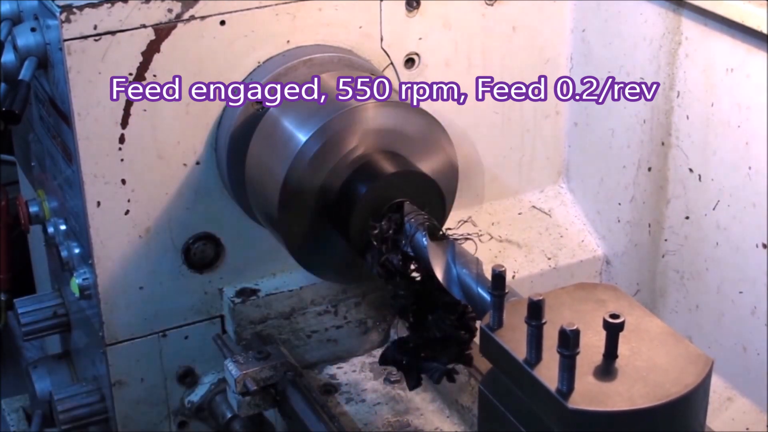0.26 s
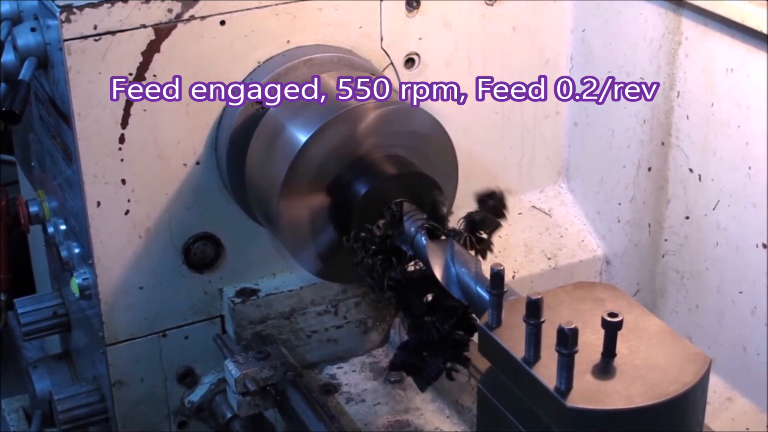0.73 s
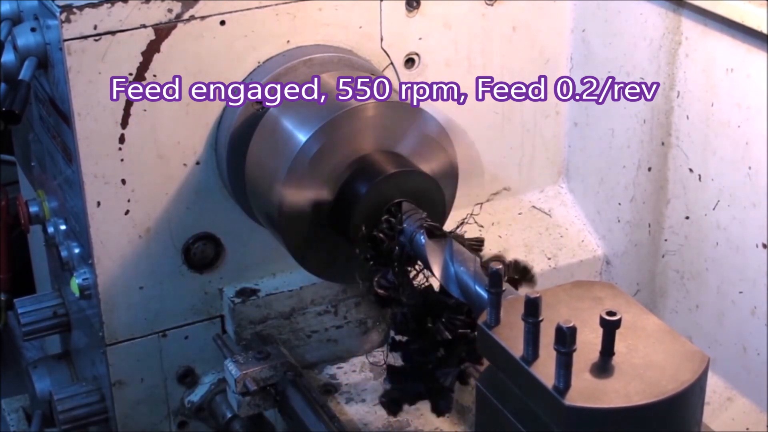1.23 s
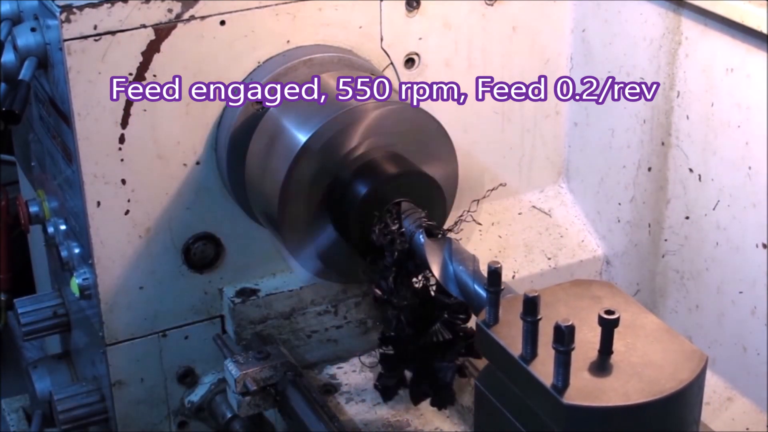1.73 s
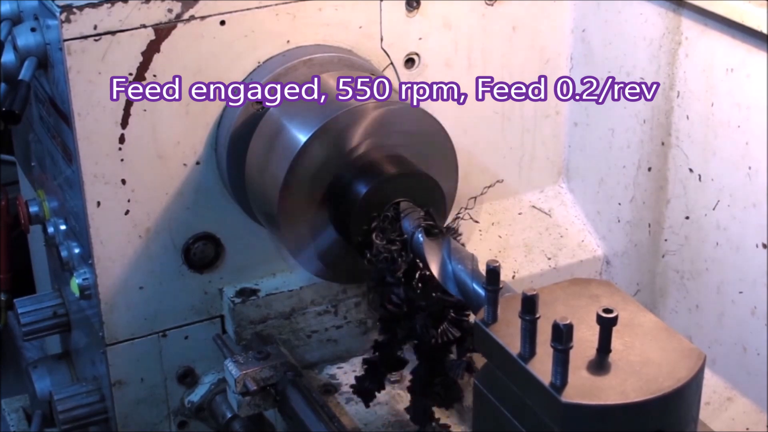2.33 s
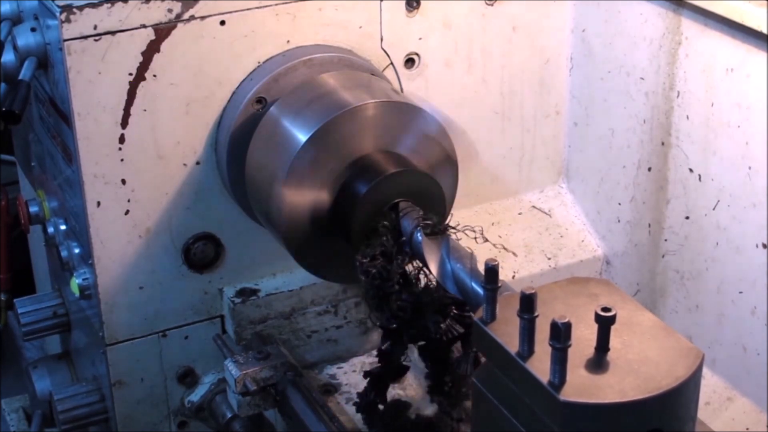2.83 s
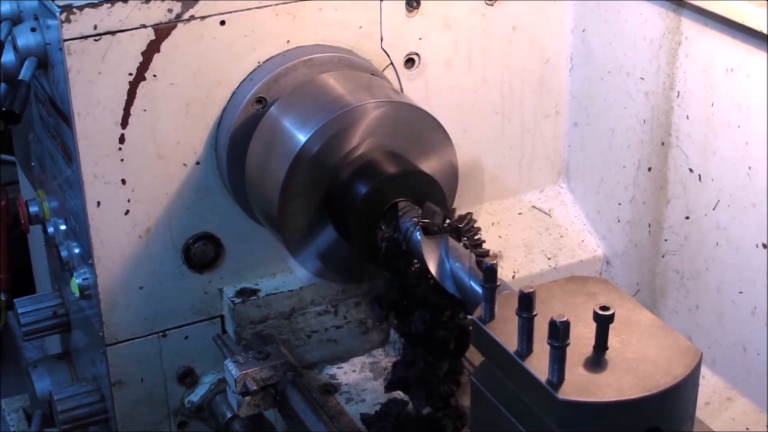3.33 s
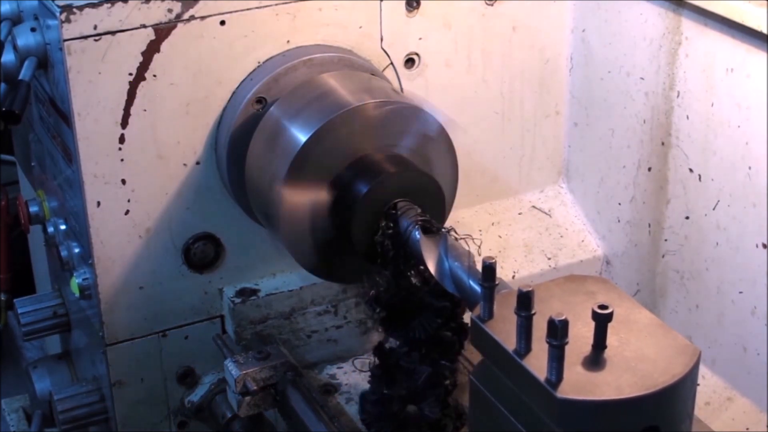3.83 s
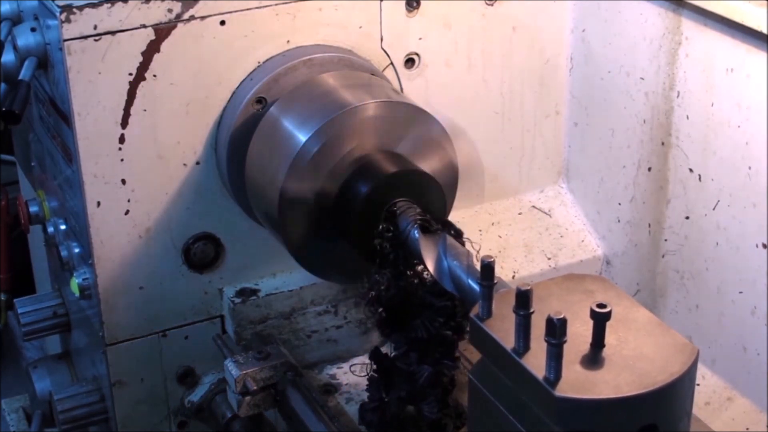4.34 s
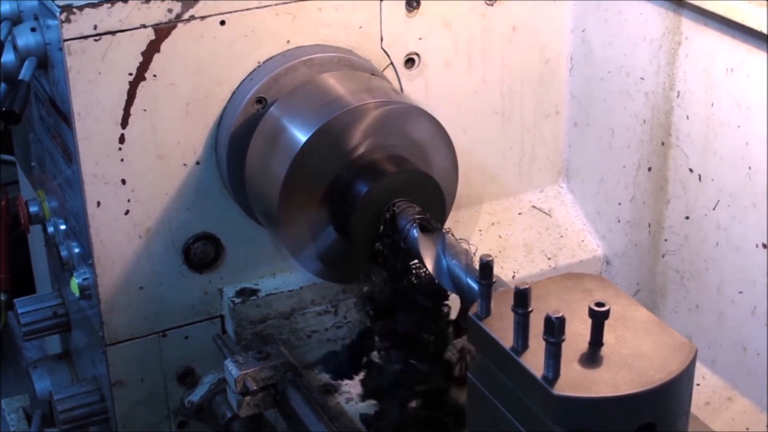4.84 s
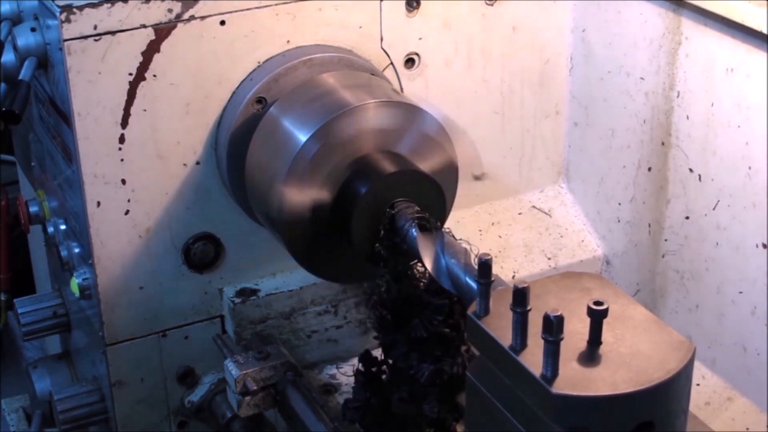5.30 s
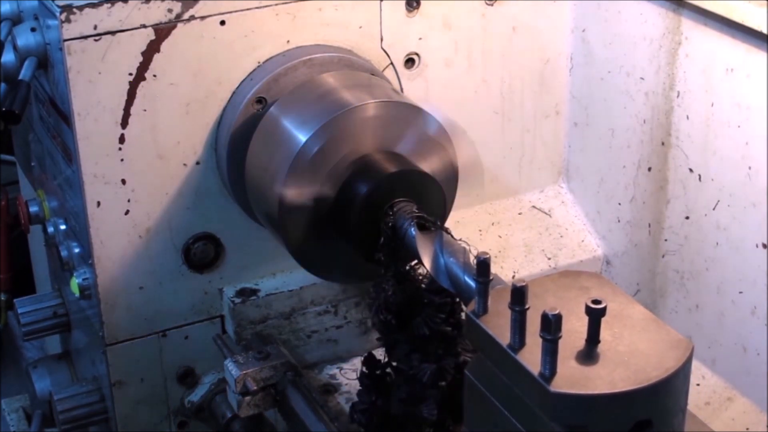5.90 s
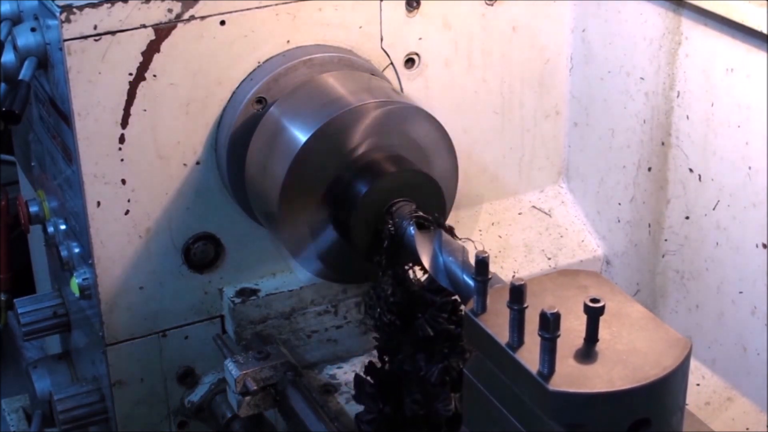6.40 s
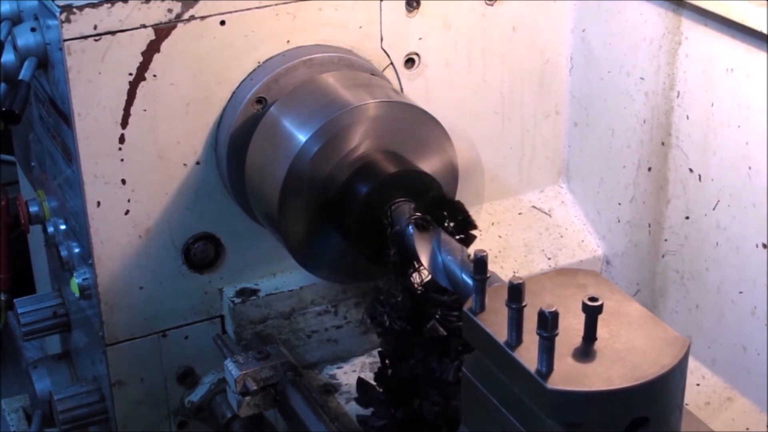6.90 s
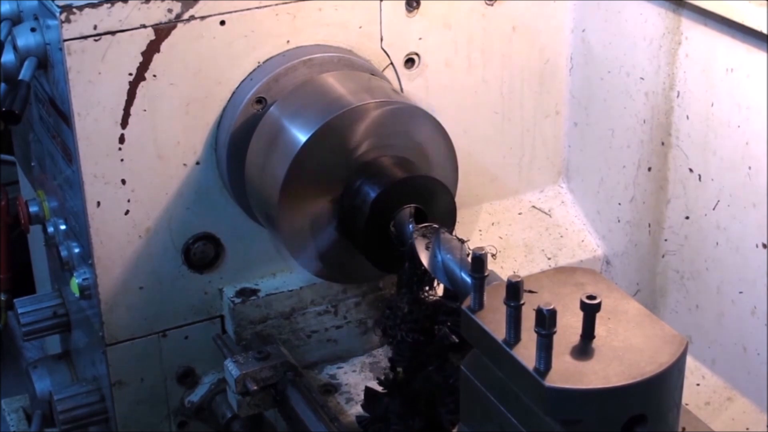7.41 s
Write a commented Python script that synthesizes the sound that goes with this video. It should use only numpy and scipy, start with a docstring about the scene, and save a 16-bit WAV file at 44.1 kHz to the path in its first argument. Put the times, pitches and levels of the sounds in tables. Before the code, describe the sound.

A lathe drilling heard from close by, in stereo with a short metallic enclosure tail. Airy whistles over fine hiss and midrange gear hum give way to a loud, piercing drill squeal that stutters, with a sharp double crack of swarf. The squeal fades to rough fluttering over rhythmic rubbing. A final choking rasp and harsh grinding burst cut off suddenly into a soft machine whine and light ticks.

```python
"""In an enclosed lathe, close to a stereo pair of microphones, a big twist drill bores a spinning plastic bar.
First thin whistles of the ribbon sliding up the flute, the lips' hiss and the whine of the gears; soon the
drill squeals in one chattering mode, the flutes rub in time with the motor shaft and a bit of swarf cracks off.
Near the end swarf clogs the flutes: the drill rasps, screeches, grinds and drags the motor down.
Then it comes free and the lathe idles, with a few flicks of swarf against the guard."""
import sys
import numpy as np
from scipy import signal
from scipy.fft import rfft, irfft, next_fast_len
from scipy.io import wavfile
from scipy.ndimage import map_coordinates

SR = 44100
rng = np.random.default_rng(int(sys.argv[2]) if len(sys.argv) > 2 else 0)


def persist_wave(psi):
    """Save psi, clipped to +-1, as 16-bit WAV."""
    counts = np.round(np.clip(psi, -1, 1) * 32767).astype(np.int16)
    wavfile.write(sys.argv[1], SR, np.atleast_2d(counts).T)


N = 337563

# strength of the drill's chatter: (time [s], relative level [dB])
CHATTER_LEVEL = [(0.0, -61.5), (0.49, -62), (0.56, -52), (0.6, -45), (0.67, -48), (0.71, -48),
                 (0.95, -39.5), (1.52, -40), (1.58, -45.5), (2.43, -50.5), (2.65, -45), (3.0, -50.5),
                 (3.42, -53.5), (3.76, -58.5), (4.65, -51), (5.3, -57.5), (6.21, -66), (6.58, -58.5),
                 (6.72, -55), (6.82, -58), (6.91, -54), (6.98, -55), (7.02, -48), (7.1, -57)]
# moments when the strong chatter loses its grip: (time [s], dip [dB])
SLIPS = [(.636, 9.5), (.688, 23), (.785, 13), (.895, 14), (1.002, 10), (1.055, 7), (1.111, 8.5), (1.177, 9),
         (1.216, 8.5), (1.245, 9), (1.343, 12), (1.406, 9.5), (1.471, 17.5), (1.53, 10.5), (1.56, 9),
         (1.592, 7.5), (1.727, 7.5), (1.79, 9), (2.06, 9.5), (2.52, 11.5), (2.665, 13), (2.88, 9.5),
         (7.062, 15)]
# moments when the weak chatter takes hold: (time [s], rise, or dip if negative [dB])
FLARES = [(2.77, 4), (3.005, 1), (3.848, -1), (4.12, 11), (4.365, 9), (6.572, 6), (6.776, 7), (6.9, 0),
          (7.073, 6.5)]
# how hard the ribbon scrapes along the flute: (time [s], relative level [dB])
RIBBON_SCRAPE = [(0.0, -62.5), (0.47, -59), (0.58, -49.5), (0.7, -57.5), (0.9, -51), (2.21, -53),
                 (2.51, -50.5), (2.55, -49.5), (3.78, -53), (3.82, -50.5), (3.89, -56), (3.98, -52),
                 (4.76, -50.5), (5.36, -53), (5.54, -51.5), (5.8, -61), (6.03, -60), (6.1, -51),
                 (6.5, -47.5)]
# thin whistles of the ribbon: (centre time [s], half length [s], pitch [Hz], glide [Hz/s], level [dB])
WHISTLES = [(.06, 0.097, 14200, 1500, -47), (.25, .06, 15000, 1998, -58), (.3, 0.26, 12600, -600, -50),
            (.37, .06, 14600, -4000, -52), (.48, .05, 14200, -3500, -45), (.62, .15, 12440, -600, -48),
            (.665, .025, 14000, -500, -44), (6.625, .01, 14000, -3000, -45), (6.67, .07, 10100, -3000, -47),
            (6.838, .005, 13950, -3000, -42), (6.895, .01, 13900, -3000, -43),
            (7.02, .04, 10550, -2000, -47)]
# the drill's hoarse upper note: (time [s], pitch [Hz])
OVERTONE_PITCH = [(1.1, 8300), (2.6, 8170), (4.8, 8320)]
# screeches as the drill binds: (centre time [s], half length [s], pitch [Hz], glide [Hz/s], level [dB])
SCREECHES = [(7.083, .008, 4250, -8000, -45), (7.109, 0.007, 3550, -15000, -40),
             (7.122, .009, 1930, -6000, -47.5), (7.125, .007, 2950, -5000, -45),
             (7.143, .006, 7600, -3000, -39), (7.161, .008, 7580, -3000, -42),
             (7.166, .011, 2860, -12000, -47.5), (7.192, .009, 7520, -3000, -42)]
# the slips grow coarser as the drill binds, so the grinding spreads down: (time [s], lower edge [Hz])
GRIND_EDGE = [(7.07, 3700), (7.1, 2690), (7.13, 1800), (7.17, 1240)]
# swarf snaps and flicks: (time [s], direct peak level [dB], band centre [Hz], t60 [s])
SNAPS = [(1.662, -28, 4100, 0.004), (1.6638, -37, 4000, .004), (1.667, -27.5, 3600, 0.0051),
         (1.669, -41, 1870, 0.0096), (1.686, -38, 3900, .007), (7.279, -44, 12470, .055),
         (7.32, -47, 12000, .03), (7.451, -49, 12500, .07), (7.465, -48, 12400, .07)]

# resonances that colour each contact: (centre [Hz], half width at -6 dB [Hz], relative level [dB])
LIP_MODES = [(10150, 160, -8), (10600, 96, -13), (11200, 72, 1), (11400, 1470, -4), (12280, 500, -2),
             (12370, 85, -4)]
# the same columns for the margins
MARGIN_MODES = [(13350, 410, -9), (14000, 240, -1), (14200, 130, -5), (14470, 110, -15),
                (15100, 470, -11.5)]
# the same columns for the ribbon
RIBBON_MODES = [(7370, 540, -9), (8310, 110, -1.5), (8640, 570, -10), (9040, 144, 4.5), (10130, 1750, -5)]
# the same columns for the flutes
FLUTE_MODES = [(4250, 370, -3), (4690, 210, -2), (5200, 210, -11), (5320, 230, 1), (5696, 390, 0.5)]
# the same columns for the shank
SHANK_MODES = [(5670, 250, 0), (6140, 340, -3.5)]
# the same columns for the packed swarf's rasp
RASP_MODES = [(3370, 740, -13), (3900, 380, -9), (5300, 250, -4), (6700, 690, -10), (7500, 260, -0.5),
              (8250, 710, -9), (9000, 180, -5), (10400, 270, -5), (12000, 720, -17), (13700, 420, -5),
              (15700, 500, -2)]
# the same columns for the grinding of the bound drill
GRIND_MODES = [(1700, 300, 0), (1900, 160, -3), (2500, 380, -15), (2910, 210, 0), (3450, 280, 1),
               (4230, 2900, -4), (5900, 470, -3), (7600, 610, 2), (8700, 400, 2.5), (10500, 2900, -6),
               (12500, 650, 0.5), (15000, 700, -10)]

# tones of the gear train in the cut: (frequency [Hz], relative level [dB])
GEAR_TONES = [(528.5, -77), (663, -71.5), (681, -74.5), (720.2, -74), (852.8, -72), (920.7, -50.5),
              (1091.3, -60.5), (1353, -73), (1551, -71.5), (1637, -75.5), (1668, -75), (1841.4, -66.5),
              (2042, -70.5), (2730, -71.5), (3306, -68.5), (7792, -74)]
# electric hum: (frequency [Hz], level at the usual cutting load [dB])
HUM_TONES = [(200.2, -68), (400.4, -70)]
# slow swell of the gear whine in the cut: (time [s], relative level [dB])
WHINE_SWELL = [(0.0, -53), (0.33, -51), (0.63, -51), (0.7, -52.5), (2.4, -50), (2.9, -52), (3.3, -50),
               (4.18, -50.5), (4.4, -51.3), (6.28, -50.5)]
# shape of the drive's rumble: (frequency [Hz], relative density [dB per Hz])
RUMBLE_SPECTRUM = [(15, -68), (25, -24), (146, -24.5), (196, -18), (320, -19), (395, -15.5), (780, -12),
                   (924, -6.5), (1010, -9.5), (1100, -5.5), (1270, -16), (1860, -12), (3300, -14),
                   (3520, -37), (4000, -15), (5200, -59), (8800, -120)]
# shape of the running machine's background noise: (frequency [Hz], relative density [dB per Hz])
IDLE_SPECTRUM = [(15, -49), (25, -24.5), (148, -17.5), (169, -18), (298, -16.5), (350, -29), (524, -14),
                 (828, -17.5), (922, -15), (1030, -21), (1910, -12.5), (2300, -24.5), (2880, -13.5),
                 (3200, -18), (3640, -15.5), (4520, -21), (15600, -25)]
# shape of the shaken machine's noise: (frequency [Hz], relative density [dB per Hz])
SHUDDER_SPECTRUM = [(40, -35), (150, -9), (330, -7), (520, 3), (800, -3), (1300, -6), (2500, -32)]

# decay in the steel enclosure: (frequency [Hz], t60 [s])
ENCLOSURE_DECAY = [(300, 0.11), (3000, 0.1), (8000, 0.11), (15000, 0.084)]
# likeness of broad noise at the two microphones: (frequency [Hz], correlation [0-1])
LIKENESS = [(50, 0.45), (200, 0.62), (700, 0.31), (2000, 0.68), (5000, .85), (9000, .7), (15000, .65)]
# balance of the two microphones: (frequency [Hz], left minus right [dB])
BALANCE = [(40, -1.5), (110, 0), (200, -3.5), (400, -1.5), (920, -1.2), (2400, -1), (4400, 0), (5400, -3),
           (8100, 0.5), (10000, 3.5), (11500, -4), (12500, -7), (14000, -12), (15500, -5)]

# the jam [s]: swarf clogs the flutes, the choked lips bite again, the drill binds, then comes free
CLOG_S, BITE_S, BIND_S, FREE_S = 6.58, 6.97, 7.14, 7.21
# time constants of the drag on the motor [s]: building up, letting go
DRAG_BUILD_S, DRAG_RELEASE_S = 0.24, 0.029
# the flutes rub more until they are buried in the hole, and later ease off [s]
BURIED_S, EASING_S = 2.55, 4.2
# base levels of the lips' hiss, the margins' sizzle and the flutes' rub [dB]; loss of hiss when choked [dB]
HISS_DB, SIZZLE_DB, RUB_DB, CHOKE_DB = -43.5, -51, -52, 8
# an ordinary scrape [dB]: above it the ribbon presses on the flute, below it the margins take over
EASY_SCRAPE_DB = -51
# base levels of the jam's rasp, grinding and shudder [dB]
RASP_DB, GRIND_DB, SHUDDER_DB = -48.5, -36.5, -56.5
# the chattering mode, its fall under full drag, and its sway with each chuck turn [Hz]
CHATTER_HZ, CHATTER_SAG_HZ, CHATTER_SWAY_HZ = 5363, 173.4, 8
# how often the weak chatter grips and lets go [Hz], and how deeply [dB]
GRIP_HZ, GRIP_DB = 18.2, 3.4
# half the length of a slip [s], and how far it throws the pitch up [Hz per dB of dip]
SLIP_S, SLIP_HZ_PER_DB = 0.0072, 3
# gear whine in the cut and at idle, and its sag under full drag [Hz]
WHINE_HZ, IDLE_HZ, SAG_HZ = 922, 941, 20
# the whine's drop under full drag and at idle [dB]
DRAG_DROP_DB, IDLE_DROP_DB = 17.5, 10.5
# turning rate of the chuck at cutting speed [Hz]; a moment when the bar's high side bears on the drill [s]
CHUCK_HZ, HIGH_SIDE_S = 9.49, 0.055
# upper band limit at the microphones [Hz]
TOP_HZ = 15780


def cutting(shaft):
    """Dense stick-slip at lips, margins, ribbon and flutes, paced by the shaft, excites their resonances."""
    hiss_db, sizzle_db, scrape_db, rub_db = cut_levels()
    contact = amp(swell(0, FREE_S, 0, 1120))
    # each turn the flutes press first, then the ribbon jerks, then the margins bear
    press = -np.cos(shaft)
    jerk = pulse(shaft, 0.57, 0.26)
    bearing = pulse(shaft, 0.78, 0.33)
    snag = wobble(40)

    hiss_gain = amp(hiss_db + 0.3 * press + 0.51 * snag + 0.9 * wobble(200))
    hiss = hiss_gain * at_microphones(grains(30000), resonant(LIP_MODES))
    sizzle_gain = amp(sizzle_db + 0.49 * snag + 0.74 * wobble(35)) * bearing
    sizzle = sizzle_gain * at_microphones(grains(28000), resonant(MARGIN_MODES))
    scrape_gain = amp(scrape_db + 2.0 + 0.37 * snag + 1.3 * wobble(70)) * jerk
    scrape = scrape_gain * at_microphones(grains(22000), resonant(RIBBON_MODES))
    rub_gain = amp(rub_db + 0.45 + 0.6 * press + 1.56 * wobble(40))
    rub = rub_gain * at_microphones(grains(18000), resonant(FLUTE_MODES))
    # the shank rings faintly from the moment the lips are fully in the cut
    ring_gain = amp(-57 + swell(0.64, 2.3, 15, 2.4) + 0.54 * snag)
    ring = ring_gain * at_microphones(grains(20000), resonant(SHANK_MODES))
    # chirps grow prominent only when the flutes rub hard
    catching = np.interp(rub_db, [-59, -52], [0.1, 0.65])
    return contact * (hiss + sizzle + scrape + rub + ring + catching * amp(rub_db) * chirps(shaft))


def cut_levels():
    """Hiss, sizzle, scrape and rub in dB, from the hole's depth, the ribbon's grip, the clog and the drag."""
    grip_db = ribbon_grip()
    # the lips hiss more as the hole deepens, and are muffled while swarf chokes them
    shallow_db = 5.1 * np.exp(-clock() / 1.57)
    choked = amp(swell(CLOG_S, BITE_S, 500, 400))
    hiss_db = HISS_DB - shallow_db + 0.09 * grip_db - CHOKE_DB * choked - 3 * drag()
    # the margins sizzle once in the hole, less under a hard-pressing ribbon or strong chatter
    lifted_db = np.interp(curves(CHATTER_LEVEL)[0], [-48, -42], [0, 4.5])
    sizzle_db = SIZZLE_DB - 0.5 * grip_db - lifted_db + swell(0.99, FREE_S, 6.5, 0)
    scrape_db = EASY_SCRAPE_DB + grip_db + 2.1 * choked
    # the rub eases off to a floor 3 dB down
    burial_db = np.maximum(swell(BURIED_S, EASING_S, 6.3, 1.53), swell(BURIED_S, FREE_S, 3.6, 0) - 3)
    rub_db = RUB_DB + burial_db + 0.15 * grip_db + 7 * drag()
    return hiss_db, sizzle_db, scrape_db, rub_db


def ribbon_grip():
    """How much harder than usual the ribbon presses on the flute, in dB."""
    return curves(RIBBON_SCRAPE)[0] - EASY_SCRAPE_DB


def chirps(shaft, centre_hz=4520, fall_hz=1500):
    """Once a shaft turn the ribbon catches in the flute and lets go with a chirp falling fall_hz per turn."""
    turns = shaft / (2 * np.pi)
    which, part = turns.astype(int), turns % 1
    # every turn draws its own size, pitch and timing
    size, detune, late = rng.standard_normal((which[-1] + 1, 3))[which].T
    at = 0.4 + 0.02505 * late
    stray_hz = 70 * wobble(3) + 70 * detune + 150 * wobble(600)
    pitch_hz = centre_hz + stray_hz - fall_hz * (part - at)
    return unit(amp(1.7 * size) * pulse(shaft, at, 1.4) * np.sin(angle(pitch_hz)))


def chatter(shaft, chuck):
    """One drill mode sings: steady when strong, pulsing when weak; drag flattens it until it is stifled."""
    level_db = curves(CHATTER_LEVEL)[0] + swell(0, 7.078, 0, 700)
    slip_db = slips()
    # the pitch jumps sharp at each slip
    sharp_hz = SLIP_HZ_PER_DB * np.maximum(slip_db, 0)
    pitch_hz = CHATTER_HZ + CHATTER_SWAY_HZ * np.cos(chuck) + sharp_hz - CHATTER_SAG_HZ * drag()
    # weak chatter is rough: part of its swing is a random flutter
    rough = np.clip(np.interp(level_db, [-56, -48.5, -43.5], [0.45, 0.12, 0.025]), 0, 1)
    flutter = (wobble(150) + 1j * wobble(150)) / np.sqrt(2)
    swing = np.sqrt(1 - rough) + np.sqrt(rough) * flutter

    grip = angle(GRIP_HZ + 1.46 * wobble(12))
    weak = np.interp(level_db, [-47, -43], [1, 0.1])
    pulsing_db = weak * (GRIP_DB * np.sin(grip) + 1.6 * wobble(65) + 1.4 * np.sin(shaft))
    pulsing_db = pulsing_db + (1.1 + 2 * drag()) * np.sin(shaft)
    # the last term is in Hz: grip and shaft turn pull the pitch a little
    pull_hz = -10 * weak * np.sin(grip) + 6 * np.cos(shaft)
    tone = np.real(swing * np.exp(1j * angle(pitch_hz + pull_hz)))
    tone_db = level_db + 5.5 - 2.06 * weak + 5.6 * drag() - slip_db + pulsing_db + 0.99 * wobble(24)
    return amp(tone_db) * tone


def slips():
    """Brief dips of the chatter, less its brief flares, in dB."""
    def bumps(rows):
        return sum(db * np.exp(-((clock() - s) / SLIP_S) ** 2) for s, db in rows)
    return bumps(SLIPS) - bumps(FLARES)


def whistle(shaft):
    """The ribbon whistles as it slides up the flute; its jerks draw a hoarse upper note from the drill."""
    # the whistles flutter differently at each microphone
    ribbon = np.array([glides(WHISTLES, flutter=450, stray_hz=119) for microphone in range(2)])
    note_db = -56 + 3.7 * ribbon_grip() + swell(0.89, 4.7, 25, 15)
    note = pulse(shaft, 0.81, 0.83) * hoarse(curves(OVERTONE_PITCH)[0], flutter=200, stray_hz=59.5)
    return ribbon + amp(note_db) * note * (1 - freed())


def jam(shaft):
    """Packed swarf rasps and screeches, grinds hardest as the drill binds, and shakes the machine."""
    rasp_db = RASP_DB + 8 * drag() + swell(CLOG_S, 7.09, 300, 122)
    grind_db = GRIND_DB + swell(BIND_S, 7.165, 94, 48) + swell(7.075, FREE_S, 300, 920)
    shudder_db = SHUDDER_DB + swell(7.155, 7.24, 270, 184)

    rasp_gain = amp(rasp_db + 1.1 * wobble(55)) * pulse(shaft, 0.6, 0.35)
    rasp = rasp_gain * at_microphones(grains(20000), resonant(RASP_MODES))
    grind_gain = amp(grind_db + 0.6 * wobble(220))
    grind = grind_gain * at_microphones(grains(17000), resonant(GRIND_MODES))
    shudder = amp(shudder_db) * at_microphones(noise(), smooth(SHUDDER_SPECTRUM))
    screeches = glides(SCREECHES, flutter=300, stray_hz=70.4)
    return rasp + above(grind, curves(GRIND_EDGE)[0]) + shudder + screeches


def snaps(crack=9):
    """Bits of swarf crack off or flick against the guard: a sharp click and a short band of rattle."""
    out = np.zeros(N + SR)
    t = np.arange(SR // 12) / SR
    for s, db, hz, t60 in SNAPS:
        edges_hz = np.clip([hz * 0.72, hz * 1.24], 100, SR / 2 - 100)
        band = signal.butter(3, edges_hz, "band", fs=SR, output="sos")
        rattle = 1.5 * rng.standard_normal(len(t)) * amp(-60 * t / t60)
        burst = signal.sosfilt(band, crack * (t == 0) + rattle)
        out[round(s * SR):][:len(t)] += amp(db) * burst / np.abs(burst).max()
    return out[:N]


def drive(whine_hz, shaft, chuck):
    """Gear tones follow the motor's speed and load, over hum, rumble and the machine's background noise."""
    whine_db, rumble_db = drive_levels()
    load = amp(whine_db)
    # every turn of the chuck sways the gears' pitch
    sway = 0.0038 * np.cos(chuck) + 0.0024 * np.sin(2 * chuck) + 0.00095 * wobble(35)
    turn = angle(whine_hz / WHINE_HZ * (1 + sway))
    gears = np.zeros(N)
    for hz, db in GEAR_TONES:
        # the strongest mesh keeps singing at light load, the weaker ones fade sooner
        strength = load ** (1 if db > -55 else 1.3)
        # higher tones waver more in level
        waver_db = (0.44 + hz / 1700) * wobble(42)
        gears += amp(db + 2.5 + waver_db) * strength * np.sin(hz * turn + rng.uniform(0, 2 * np.pi))

    hum = np.zeros(N)
    for hz, db in HUM_TONES:
        hum += amp(db + wobble(6.5)) * np.sin(angle(hz + 0.5 * wobble(5.88)))
    hum *= load ** 0.74
    rumble = amp(rumble_db + 9.0 + 1.3 * wobble(16)) * at_microphones(noise(), smooth(RUMBLE_SPECTRUM))
    # the background is quieter from 6.7 s until shortly after the drill comes free
    idle_db = -59.0 - 2.9 * amp(swell(6.7, 7.38, 200, 130))
    idle = amp(idle_db) * at_microphones(noise(), smooth(IDLE_SPECTRUM))
    return gears * (1 + 0.097 * np.sin(shaft)) + hum + rumble + idle


def drive_levels():
    """Whine and rumble in dB swell together and drop under drag and at idle."""
    swing_db = curves(WHINE_SWELL)[0]
    swing_db = swing_db - np.median(swing_db)
    # the whine sinks further while the drill is bound, returns at once and falters briefly
    bound_db = 12 * amp(swell(7.05, 7.26, 624, 600))
    falter_db = 9 * amp(swell(7.33, 7.35, 700, 700))
    idle_drop_db = (IDLE_DROP_DB - swell(7.1, 8, 20, 0)) * freed()
    whine_db = swing_db - DRAG_DROP_DB * drag() - bound_db - falter_db - idle_drop_db
    rumble_db = -67.0 + 1.9 * swing_db - 8 * drag() - 8.6 * freed()
    return whine_db, rumble_db


def drag():
    """Drag of the packed swarf, 0-1: it grows ever faster until the drill binds, and ends as it comes free."""
    return np.exp(np.minimum(clock() - BIND_S, 0) / DRAG_BUILD_S) * (1 - freed())


def freed():
    """0 while the drill cuts, easing to 1 once it has come free."""
    return 1 - np.exp(-np.maximum(clock() - FREE_S, 0) / DRAG_RELEASE_S)


def enclosure(x):
    """The steel walls answer with a short, dense tail at each microphone, decaying by frequency."""
    hz, t, z = signal.stft(rng.standard_normal((2, SR // 3)), SR, nperseg=256)
    decay = amp(-60 * t / along(ENCLOSURE_DECAY, hz)[:, None])
    tail = signal.istft(z * decay, SR, nperseg=256)[1]
    return signal.fftconvolve(x, tail / np.linalg.norm(tail[0]), axes=1)[:, :N]


def grains(rate):
    """Two unrelated trains of tiny stick-slip releases of random size, rate a second."""
    return unit(noise() * (rng.random(N) < rate / SR))


def glides(rows, flutter=350, stray_hz=70):
    """Short friction tones that swell and fade while their pitch slides."""
    out = np.zeros(N)
    for s, length, hz, hz_per_s, db in rows:
        u = np.clip((clock() - s) / length, -4, 4)
        out += amp(db) * np.exp(-u ** 2) * hoarse(hz + hz_per_s * length * u, flutter, stray_hz)
    return out


def hoarse(pitch_hz, flutter=350, stray_hz=70):
    """A hoarse friction tone of rms 1 that strays about its pitch; friction limits its swing."""
    return unit(np.tanh(2 * wobble(flutter)) * np.sin(angle(pitch_hz + stray_hz * wobble(90))))


def pulse(shaft, at, sharp):
    """A gain of rms 1 that peaks once a shaft turn, at the given part of the turn."""
    return unit(np.exp(sharp * np.cos(shaft - 2 * np.pi * at)))


def swell(full_s, until_s, rise_db_per_s, fall_db_per_s):
    """Attack, hold and release in dB: 0 between the two times."""
    t = clock()
    return -rise_db_per_s * np.maximum(full_s - t, 0) - fall_db_per_s * np.maximum(t - until_s, 0)


def at_microphones(pair, colour):
    """Two unrelated signals coloured and blended into a partly alike left and right, rms 1."""
    def blend(hz):
        # mid and side shares whose sum and difference have the wanted correlation
        turn = np.arccos(np.clip(along(LIKENESS, hz), -1, 1)) / 2
        return colour(hz) * np.array([np.cos(turn), np.sin(turn)])
    mid, side = filtered(pair, blend)
    return unit(np.array([mid + side, mid - side]))


def resonant(modes):
    """Response of a set of resonances with steep skirts, added in power."""
    grid = np.linspace(0, SR / 2, 4096)
    power = sum(amp(db) ** 2 / (1 + ((grid - c) / w) ** 2) ** 2 for c, w, db in modes)
    gain = np.sqrt(power)
    return lambda hz: np.interp(hz, grid, gain)


def smooth(points):
    """Response through (frequency [Hz], level [dB]) points."""
    return lambda hz: amp(along(points, hz))


def filtered(x, response):
    """x times a response of frequency."""
    m = next_fast_len(N + SR // 4)
    return irfft(rfft(x, m) * response(np.fft.rfftfreq(m, 1 / SR)), m)[..., :N]


def above(x, edge_hz):
    """x with what lies under a moving edge rolled off."""
    hz, t, z = signal.stft(x, SR, nperseg=256)
    edge = np.interp(t, clock(), edge_hz)
    return signal.istft(z / (1 + (edge / (hz[:, None] + 1)) ** 4), SR, nperseg=256)[1][:, :N]


def noise():
    """Two unrelated white noises."""
    return rng.standard_normal((2, N))


def wobble(rate, count=12):
    """A smooth random curve, rate knots a second, drawn with count points between knots."""
    knots = rng.standard_normal(int(N * rate / SR) + 4)
    fine = np.arange((len(knots) - 1) * count) / count
    return np.interp(np.arange(N) * (rate / SR), fine, map_coordinates(knots, [fine]))


def angle(hz):
    """Running phase of a frequency curve."""
    return 2 * np.pi * np.cumsum(hz) / SR


def curves(rows):
    """One value per sample for each column after the time."""
    s, *cols = np.transpose(rows)
    return [np.interp(clock(), s, c) for c in cols]


def along(points, hz):
    """(frequency [Hz], value) points read on a log axis."""
    f, v = np.transpose(points)
    return np.interp(np.log(hz + 1), np.log(f + 1), v)


def clock():
    """Time of every sample in seconds."""
    return np.arange(N) / SR


def amp(db):
    """Decibels to gain."""
    return np.exp(np.asarray(db) * (np.log(10) / 20))


def unit(x):
    """x at rms 1."""
    return x / np.sqrt(np.mean(x ** 2) + 1e-20)


def scene():
    """Motor shaft and chuck pace the sources; drag slows them, idling speeds them up."""
    whine_hz = WHINE_HZ - SAG_HZ * drag() ** 0.75 + (IDLE_HZ - WHINE_HZ) * freed()
    # the shaft turns at one eighteenth of the whine's pitch
    shaft = angle(whine_hz / 18) + rng.uniform(0, 2 * np.pi)
    chuck = angle(CHUCK_HZ * whine_hz / WHINE_HZ) - 2 * np.pi * CHUCK_HZ * HIGH_SIDE_S
    friction = cutting(shaft) + whistle(shaft) + jam(shaft) + snaps()
    machine = drive(whine_hz, shaft, chuck)
    return chatter(shaft, chuck) + friction + machine + amp(-3.5) * enclosure(friction)


def record(dry, lag_s=2.2e-5):
    """The right microphone is nearer the cut: sound arrives sooner, its top treble stronger, up to TOP_HZ."""
    side = np.array([[0.5], [-0.5]])

    def placement(hz):
        level = amp(side * along(BALANCE, hz))
        delay = np.exp(-2j * np.pi * hz * side * lag_s)
        return level * delay
    microphones = filtered(dry, placement)
    return filtered(microphones, lambda hz: hz < TOP_HZ)


dry = scene()
out = record(dry)
persist_wave(out)
```